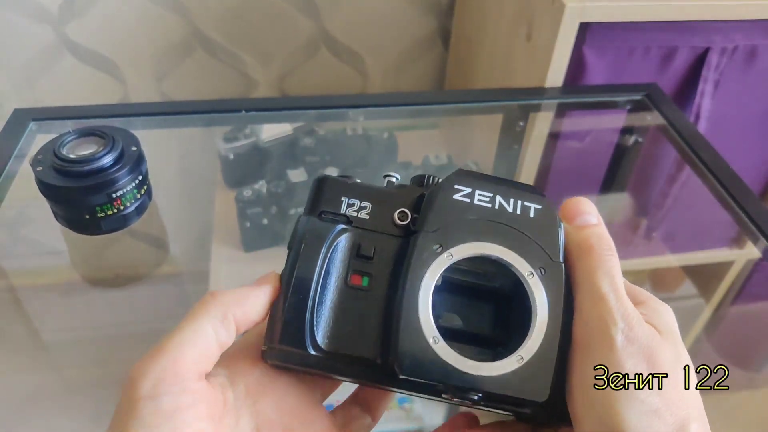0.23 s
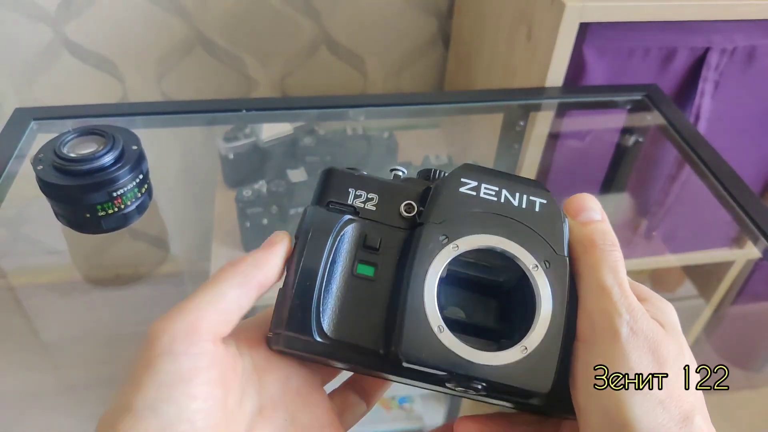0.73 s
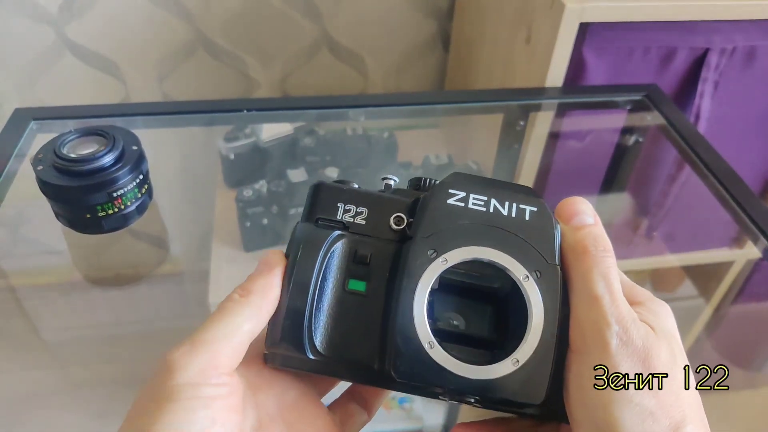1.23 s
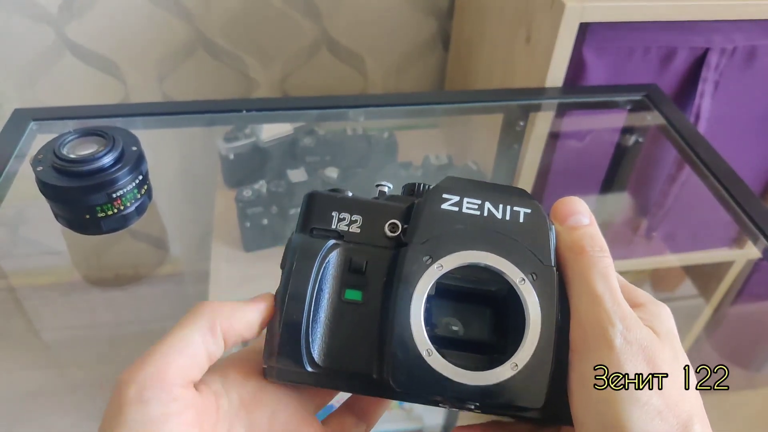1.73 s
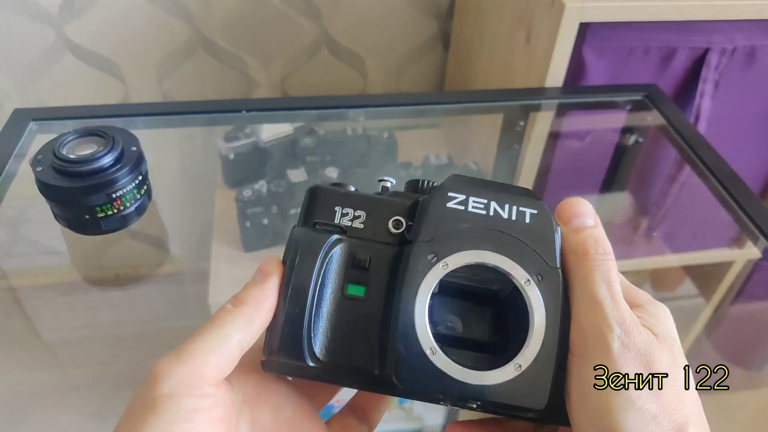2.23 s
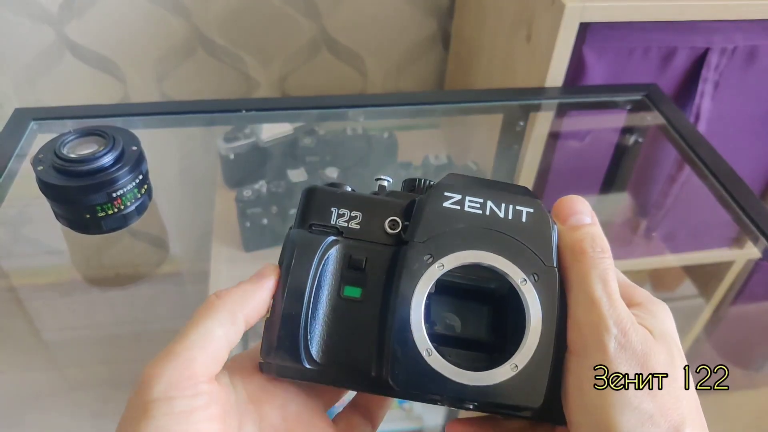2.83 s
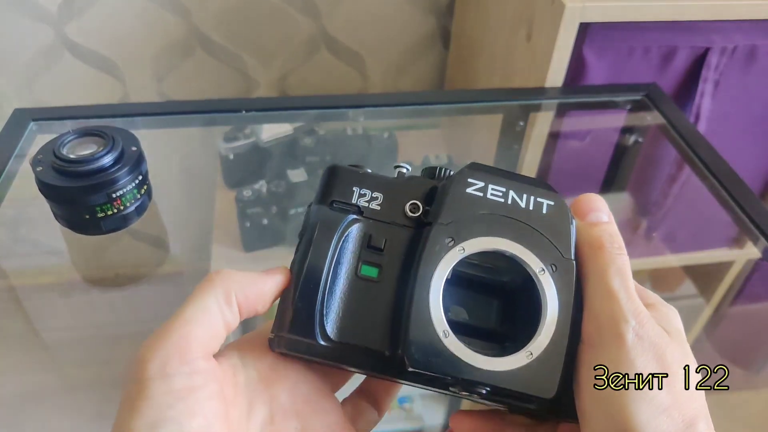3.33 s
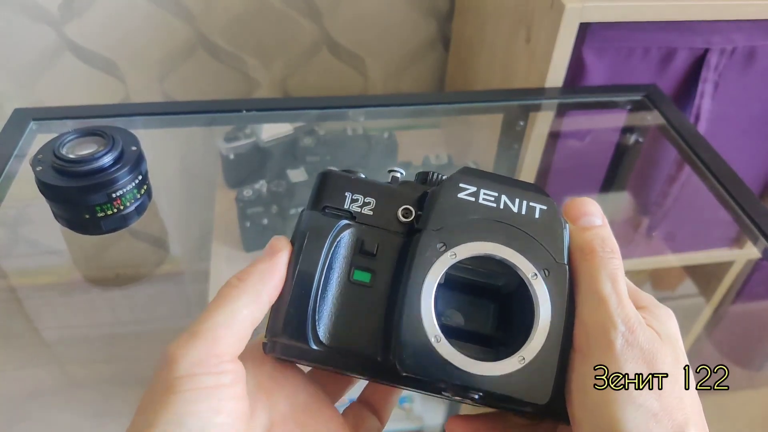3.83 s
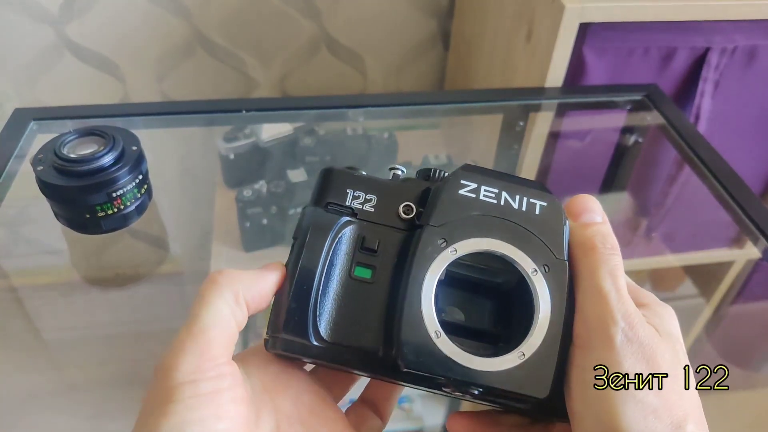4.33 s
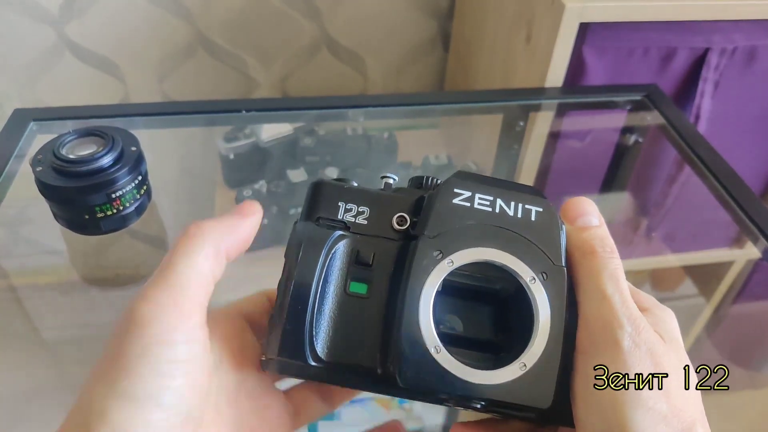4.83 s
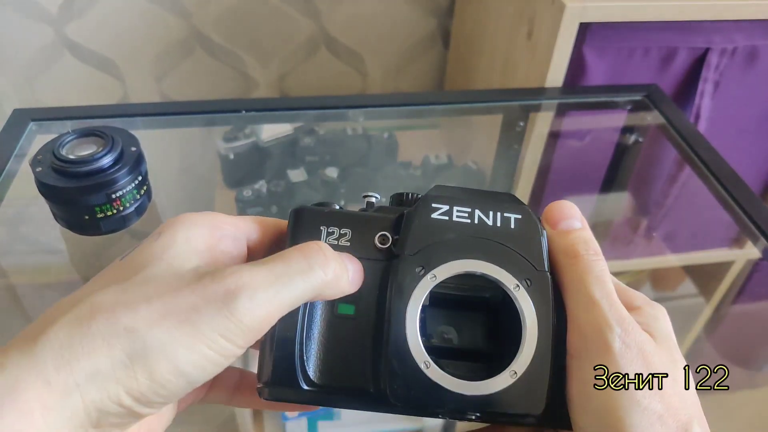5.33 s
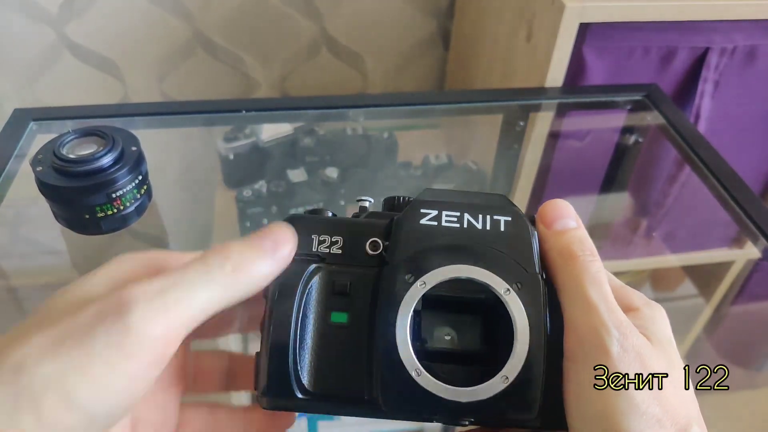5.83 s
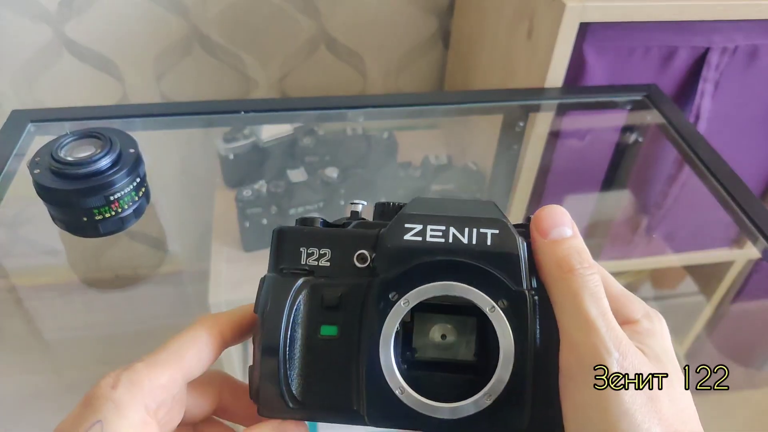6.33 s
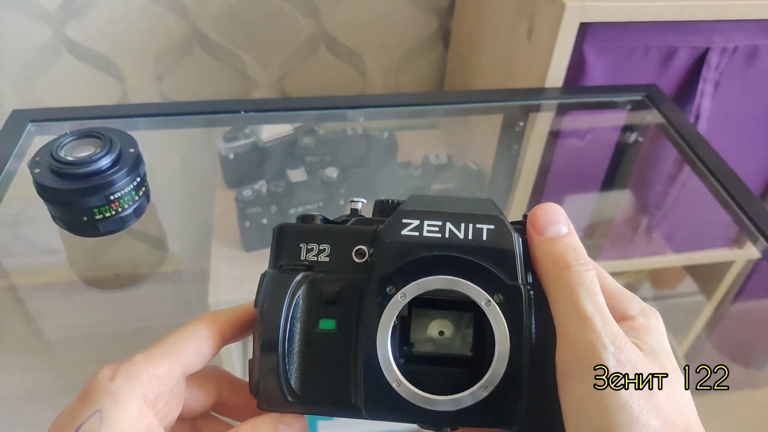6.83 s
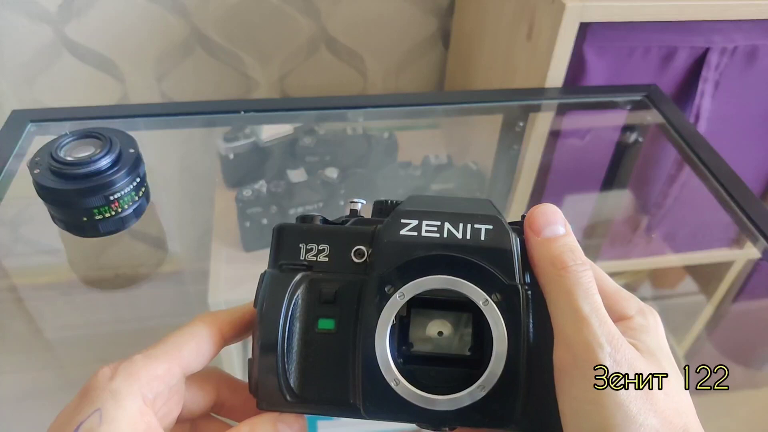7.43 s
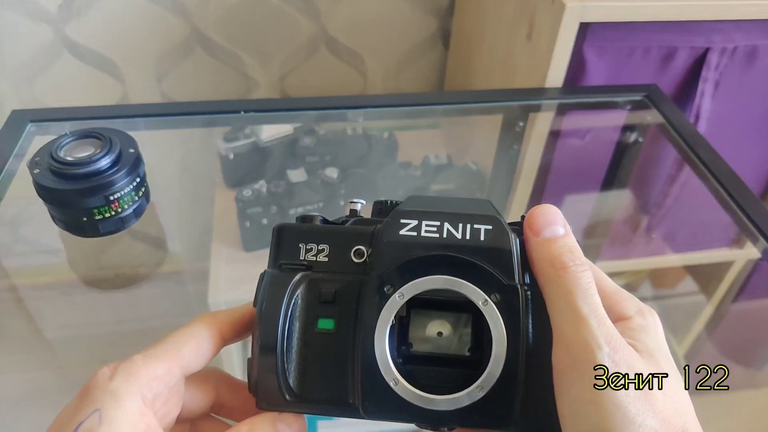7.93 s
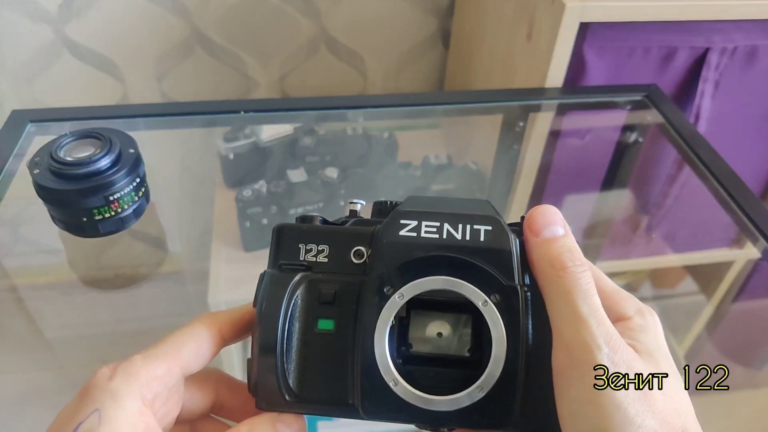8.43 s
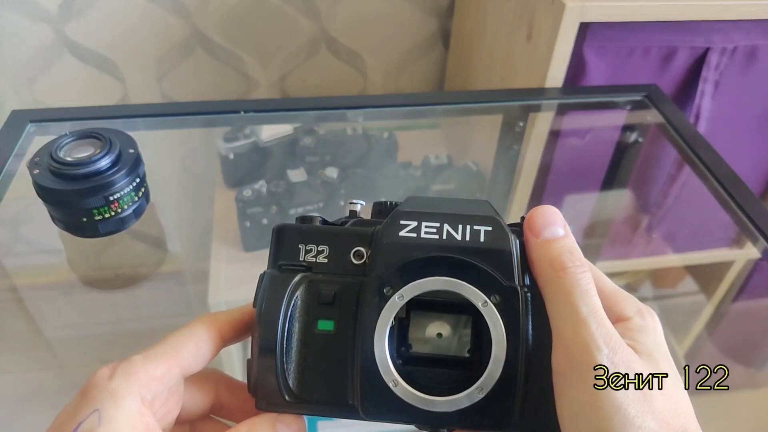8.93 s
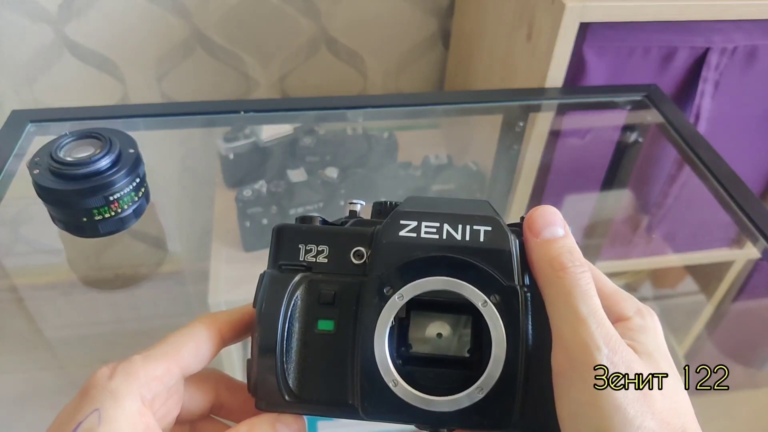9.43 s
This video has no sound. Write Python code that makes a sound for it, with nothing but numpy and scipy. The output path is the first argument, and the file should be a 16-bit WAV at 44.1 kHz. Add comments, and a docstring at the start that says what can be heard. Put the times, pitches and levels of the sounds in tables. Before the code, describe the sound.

Close, dry ticking and small knocks from a handheld mechanical camera, then a fast whirring gear buzz, a loud shutter crack, and buzzing to the end.

```python
"""A film camera's clockwork self-timer, held in the hands close to two microphones in a small room.
First the escapement (the part that beats) sticks: single ticks and short runs, amid knocks and rubs.
Then it runs free and buzzes at about 210 beats a second; soon the shutter trips with one sharp snap.
The buzz goes on to the end, and late on a low drone swells. Air and a faint hum lie under it all.
Blows are short bursts of noise that ring the camera's resonances; hollow rings are damped sine tones."""
import sys
import numpy as np
from scipy import signal
from scipy.fft import rfft, irfft
from scipy.io import wavfile

SR = 44100
rng = np.random.default_rng(int(sys.argv[2]) if len(sys.argv) > 2 else 0)


def unload_audio(sound):
    """Save the sound as a 16-bit wav file, at the path given as the first command line argument."""
    columns = np.transpose(np.atleast_2d(sound))
    # keep every value between -1 and 1, then stretch to whole-number steps
    steps = np.round(np.clip(columns, -1, 1) * 32767)
    wavfile.write(sys.argv[1], SR, steps.astype(np.int16))


N = 426447
TIME, HZ = np.arange(N) / SR, np.fft.rfftfreq(4096, 1 / SR)
START_S = 5.644  # the escapement comes free


def amp(db):
    """Decibels to gain."""
    return 10 ** (np.asarray(db) / 20)


def read(points, hz):
    """A table's value at hz, on a log-frequency axis."""
    f, value = np.transpose(points)
    return np.interp(np.log(hz + 1), np.log(f + 1), value)


def unit(x):
    """Scales to rms 1."""
    return x / np.sqrt(np.mean(x ** 2) + 1e-20)


def add(mix, s, sound):
    """Mixes a sound in at time s."""
    part = mix[max(round(s * SR), 0):][:len(sound)]
    part += sound[:len(part)]


def wander(rate):
    """Slow chance of rms 1 that changes about rate times a second."""
    size = 16384
    hz = np.fft.rfftfreq(size, TIME[-1] / size)
    smooth = np.exp(-(hz / rate) ** 2)
    slow = irfft(rfft(rng.standard_normal(size)) * smooth)
    return unit(np.interp(TIME, np.linspace(0, TIME[-1], size), slow))


def fuzzy_tone(hz, width):
    """A tone of rms 1 whose level and phase waver."""
    cosine = wander(width) * np.cos(2 * np.pi * hz * TIME)
    return cosine + wander(width) * np.sin(2 * np.pi * hz * TIME)


def colour(x, gain):
    """Causal filter of unit energy with the given gain over HZ: its peaks ring after each blow."""
    log_gain = np.log(np.maximum(gain / gain.max(), 1e-5))
    mirrored = np.r_[log_gain, log_gain[-2:0:-1]]
    # minimum phase: nothing sounds before the blow
    taps = np.fft.ifft(np.exp(signal.hilbert(mirrored).conj())).real
    return signal.oaconvolve(x, taps[None] / np.linalg.norm(taps), axes=1)[:, :N]


def weigh(x, gain):
    """Weights the frequencies of one channel without delaying it."""
    return signal.oaconvolve(x, np.fft.fftshift(irfft(gain))[1:], "same")


def pair(x, likeness):
    """Makes two unrelated channels alike, by frequency."""
    same = np.clip(read(likeness, HZ), -1, 1)
    return np.array([x[0], weigh(x[0], same) + weigh(x[1], np.sqrt(1 - same ** 2))])


def chatter(envelope, gain):
    """Metal parts rattle against each other: noise under an envelope rings the resonances."""
    return colour(envelope * rng.standard_normal((2, N)), gain)


def blows(times, levels_db, rise, fall, linger, linger_db):
    """Envelope of blows: a quick rise, a quick fall, and a weaker rattle that lingers (all in s)."""
    t, power = np.arange(SR // 4) / SR, np.zeros(N)
    decay = np.exp(-t / fall) + amp(linger_db) * np.exp(-t / linger)
    shape = (1 - np.exp(-(t / rise) ** 2)) * decay
    for s, db in zip(times, levels_db):
        add(power, s, (amp(db) * shape / shape.max()) ** 2)
    return np.sqrt(power)


def rings(times, levels_db, pitches_hz, rise, fall):
    """Short damped tones in the first channel, one for each blow (rise and fall in s)."""
    t, out = np.arange(SR // 10) / SR, np.zeros((2, N))
    for s, db, hz in zip(times, levels_db, pitches_hz):
        envelope = (1 - np.exp(-t / rise)) * np.exp(-t / fall)
        add(out[0], s, amp(db) * envelope * np.sin(2 * np.pi * hz * t))
    return out


# resonances of the camera: f/Hz, width/Hz, then the relative level/dB of each
# under the running escapement, under a single tick, and under the shutter
RESONANCES = [(737, 480, -26.5, -22, -38), (1066.3, 42.4, -7, -8.5, -21), (1181, 260, -16.5, -14, -7.5),
              (1833, 180, -10.5, -9, 1), (2260, 310, -9.5, -9, -5), (2450, 350, -20, -13, -3.5),
              (3110, 580, -13.5, -11.5, -12), (3594, 210, -11, -11.5, -22), (4250, 450, -17.5, -11.5, 2.5),
              (4827, 323, -12.5, -8, 5), (5430, 490, -15.5, -5.5, 6.5), (5780, 203, -4.5, -10.5, -19),
              (6150, 280, -9, -5.5, -9), (6770, 360, -12, -6, 6), (7960, 1130, -7.5, -1.5, -16),
              (8550, 440, -9.5, -2, 6), (8870, 280, -1.5, -22, -11), (9280, 910, -23, -1, 1.5),
              (9720, 430, -3.5, -15, -5), (10550, 340, -11.5, -1.5, 3), (11240, 450, -12.5, -4.5, -12),
              (11960, 650, -11.5, -11.5, -22), (12100, 1400, -11, -9, -7), (14200, 459, -16, -19, -13),
              (14840, 1800, -13.5, -7.5, -3), (15150, 600, -3, -23, -21)]
RUNNING, TICK, SNAP = 2, 3, 4  # the three level columns
SPLIT_HZ = 3550  # the case speaks below, the steel parts above


def camera(column):
    """Gains over HZ of the camera's resonances: those of the steel parts and those of the case."""
    columns = np.transpose(RESONANCES)
    hz, width = columns[:2]
    peaks = amp(columns[column]) / (1 + 2 * ((HZ[:, None] - hz) / width) ** 2)
    gain = np.linalg.norm(peaks, axis=1) * HZ / np.hypot(HZ, 250)  # less bass below 250 Hz
    upper = 1 - 1 / (1 + (HZ / SPLIT_HZ) ** 12)
    return gain * np.sqrt(upper), gain * np.sqrt(1 - upper)


def beats(turns, uneven_db, limp_db, rise, fall, rub):
    """Envelope of the escapement: each beat has its own strength, and the two pallets may differ."""
    beat, phase, running = turns.astype(int), turns % 1, TIME > START_S
    size = amp(uneven_db * rng.standard_normal(N)[beat] + limp_db * (-1.) ** beat)
    strike = (1 - np.exp(-(phase / rise) ** 2)) * np.exp(-phase / fall)  # rise, fall: parts of a beat
    envelope = (size * strike + rub) * running
    return envelope / np.sqrt(np.mean(envelope[running] ** 2))


USUAL_RATE = 208.6  # beats per second
STEEL_DB, CASE_DB = -35.5, -41.5  # force at that speed; buzz() lifts the steel further
DB_PER_RATE = 0.0748  # faster beats strike harder: dB for each extra beat per second
WEAK_S, WEAK_STEEL_DB, WEAK_CASE_DB = 0.24, -4, -6  # the first beats are weaker by this much


def force(speed):
    """Gains of steel and case: the beats gain strength at first, and follow the speed throughout."""
    weak = np.clip(1 - ((TIME - START_S) / WEAK_S) ** 2, 0, 1)
    drive_db = DB_PER_RATE * (speed - USUAL_RATE)
    return amp(STEEL_DB + drive_db + WEAK_STEEL_DB * weak), amp(CASE_DB + drive_db + WEAK_CASE_DB * weak)


# speed of the free-running escapement, before it strays: t/s, beats per second
SPEED = [(5.7, 228), (5.82, 205), (6.36, 223.5), (6.54, 197), (7.08, 220.5), (7.2, 199), (7.44, 214),
         (7.74, 227), (7.86, 206), (8.1, 204), (8.16, 207), (9.0, 205), (9.12, 219), (9.3, 218),
         (9.48, 197), (9.6, 210)]
# the vibrating body murmurs under the buzz: f/Hz, relative level/dB
MURMUR = [(30, -4), (70, -6.5), (100, 1), (125, -13), (165, -4), (188, -15), (212, -8.5), (250, -11),
          (330, -14), (500, -32)]
# early beats ring like single ticks (share 0-1), then the colour changes
EARLY_SHARE, CHANGE_AT_S, CHANGE_S = 0.68, 6.35, 0.078


def buzz():
    """The spring drives the escapement freely; play in the gears makes the beats stray."""
    speed = np.interp(TIME, *np.transpose(SPEED))
    rate = speed * (1 + .015 * wander(25) + .045 * wander(200))
    running = TIME > START_S
    turns = np.cumsum(rate * running) / SR
    turns = np.maximum(turns + 0.021 * np.sin(np.pi * turns), 0)  # tick and tock are not evenly spaced

    steel_level, case_level = force(speed)
    steel_beats = beats(turns, uneven_db=1.5, limp_db=0.6, rise=0.16, fall=0.38, rub=0.1)
    steel_beats *= amp(5.5) * steel_level
    pallet_beats = beats(turns, uneven_db=2.0, limp_db=0.0, rise=.13, fall=0.21, rub=0.046)
    pallet_beats *= amp(5.0) * steel_level
    case_beats = case_level * beats(turns, uneven_db=1.4, limp_db=1.2, rise=0.038, fall=1.0, rub=0.34)

    top = 1 - 1 / (1 + (HZ / 13500) ** 20)  # the pallet's own high ring varies most from beat to beat
    thin = 1 / (1 + (480 / (HZ + 1)) ** 4)  # takes the bass out of the case
    before_change = .5 * (1 - np.tanh((TIME - CHANGE_AT_S) / (2 * CHANGE_S)))
    early = np.clip(EARLY_SHARE * before_change, 0, 1)
    out = chatter(amp(-64.0) * running, amp(read(MURMUR, HZ)))
    for column, share in ((RUNNING, 1 - early), (TICK, early)):
        steel, case = camera(column)
        high = np.sum(steel ** 2 * top) / np.sum(steel ** 2)  # part of the steel's energy
        out += chatter(steel_beats * np.sqrt(share * (1 - high)), steel * np.sqrt(1 - top))
        out += chatter(pallet_beats * np.sqrt(share * high), steel * np.sqrt(top))
        out += chatter(case_beats * np.sqrt(share), case * thin)
    return out * amp(.5 * wander(31))


# the shutter trips: t/s, level/dB of the ringing steel, level/dB of the knocking case
SHUTTER = [(5.8335, -9.5, -14.5)]


def shutter():
    """The timer trips the shutter: one hard, thin snap."""
    s, steel_db, case_db = np.transpose(SHUTTER)
    steel, case = camera(SNAP)
    ring = blows(s, steel_db, rise=0.00014, fall=0.0011, linger=.0035, linger_db=-22)
    knock = blows(s, case_db, rise=0.00018, fall=0.0013, linger=0.0048, linger_db=-11)
    thin = 1 / (1 + (750 / (HZ + 1)) ** 4)
    return chatter(ring, steel) + chatter(knock, case * thin)


# short runs before it sticks again: start t/s, number of beats, beats per second,
# level/dB of the steel, level/dB of the case
RUNS = [(0.5499, 6, 175, -28, -40), (2.0671, 7, 200, -28.5, -45), (2.9369, 6, 203, -27.5, -43.5),
        (3.7504, 7, 186, -27.5, -43.5)]
RUN_ENDS_DB = -5.5  # a run is strongest in the middle; its first and last beats are this much weaker
RUN_UNEVEN_DB = 1.2  # the beats of a run differ by chance
CATCH_S, CATCH_DB = 0.0174, -18.5  # the pallet gives a faint tick just before each run


def run_beats():
    """Rows (s, steel dB, case dB) for every run: a faint catch, then quick beats that swell and fade."""
    rows = []
    for start, count, rate, steel_db, case_db in RUNS:
        rows.append((start - CATCH_S, steel_db + CATCH_DB, case_db + CATCH_DB))
        for k, place in enumerate(np.linspace(-1, 1, round(count))):
            arch_db = RUN_ENDS_DB * place ** 2 + RUN_UNEVEN_DB * rng.standard_normal()
            rows.append((start + k / rate, steel_db + arch_db, case_db + arch_db))
    return rows


# single ticks of the sticking clockwork: t/s, level/dB of the ringing steel, level/dB of the knocking case
TICKS = [(0.0925, -29, -44.5), (0.099, -38.5, -53), (0.590, -28, -31.5), (0.6804, -32, -51.5),
         (0.8073, -23.5, -39.5), (0.97, -43, -50), (1.1513, -30, -48), (1.1613, -28.5, -41),
         (1.167, -34, -47), (1.2327, -33.5, -48.5), (1.2572, -32.5, -52), (1.399, -34, -54.5),
         (1.641, -24, -37), (2.4953, -34, -51), (2.509, -25.5, -38.5), (3.034, -31.5, -50.5),
         (3.2403, -26, -42), (3.5933, -61, -58.5), (3.8438, -32, -48.5), (3.9229, -31.5, -48),
         (4.0586, -23, -41.5), (4.5272, -54.5, -68), (4.8247, -22.5, -34)]


def ticks():
    """The pallet scrapes along a tooth, then drops onto the next."""
    s, steel_db, case_db = np.transpose(list(TICKS) + run_beats())
    steel, case = camera(TICK)
    scrape = blows(s - .0048, steel_db - 23, rise=.002, fall=0.0023, linger=.003, linger_db=-14)
    drop = blows(s - .0003, steel_db, rise=0.00097, fall=0.00097, linger=0.0041, linger_db=-12.5)
    knock = blows(s - .0003, case_db, rise=0.0011, fall=0.00093, linger=0.0069, linger_db=-10.0)
    return chatter(np.hypot(scrape, drop), steel) + chatter(knock, case)


PLATE_HZ, PLATE_DB = 1994, -28.5  # level under the hardest tick
PLATE_SLOPE = 2.3  # dB lost for each dB that a tick is softer


def plate():
    """Hard single ticks set a plate of the body ringing; softer ones much less."""
    s, steel_db = np.transpose(TICKS)[:2]
    levels_db = PLATE_DB + PLATE_SLOPE * (steel_db - steel_db.max())
    return rings(s, levels_db, np.full(len(s), PLATE_HZ), rise=.0006, fall=0.0028)


# the case creaks and knocks under the fingers: t/s, level/dB of the clack,
# level/dB of the hollow ring, f/Hz of the ring
KNOCKS = [(0.154, -53, -51, 1110), (0.277, -41.5, -38, 2000), (0.855, -53, -44, 1250),
          (0.97, -37.5, -41, 1250), (1.630, -47, -33, 1230), (1.853, -45.5, -41, 1930),
          (2.29, -56, -62, 1200), (2.561, -55, -58, 1100), (2.681, -44, -48, 1330), (2.847, -56, -43, 1240),
          (2.977, -52, -42, 1120), (3.394, -53, -58.5, 1200), (4.112, -41.5, -42, 1250),
          (4.219, -44, -37, 3920), (4.367, -54, -58, 1210), (4.404, -75, -56, 1280),
          (4.712, -64, -48.5, 2080), (5.14, -64, -46, 1070), (5.277, -66, -50, 1070),
          (5.656, -49, -34, 1270)]
OVERTONE, OVERTONE_DB = 2.13, -10.5  # each hollow ring has one weaker, higher partial


def knocks():
    """Each small slip of the case gives a dull clack and a short hollow ring."""
    s, clack_db, ring_db, hz = np.transpose(KNOCKS)
    steel, case = camera(TICK)
    clack = blows(s, clack_db, rise=0.00057, fall=0.0012, linger=0.0057, linger_db=-10)
    dull = case + amp(-8) * steel / (1 + (HZ / 4500) ** 2)
    ring = rings(s, ring_db, hz, rise=0.00075, fall=0.0029)
    partial = rings(s, ring_db + OVERTONE_DB, hz * OVERTONE, rise=0.00044, fall=.0018)
    return chatter(clack, dull) + ring + partial


# the clearest rubs, as the thumb reaches for the button: t/s, level/dB
RUBS = [(4.463, -67.5), (4.685, -62.5), (4.972, -59), (5.048, -65), (5.135, -63.5), (5.277, -59.5),
        (5.585, -60)]
FAINT_RUBS_DB, RUB_SPREAD_DB = -71, 9  # fainter ones come at random while the clockwork sticks


def fingers():
    """Skin slips on the case in soft, scattered rubs that catch once and drag on."""
    when, size = rng.random((18, 2)).T
    faint = np.c_[when * START_S, FAINT_RUBS_DB + RUB_SPREAD_DB * (size - .5)]
    s, levels_db = np.r_[RUBS, faint].T
    case = camera(TICK)[1]
    rubs = blows(s - .002, levels_db, rise=0.0026, fall=0.0066, linger=0.029, linger_db=-14)
    return chatter(rubs, case / (1 + (HZ / 1400) ** 3))


# soft bumps of the hands on the body: t/s, level/dB of the thud, level/dB of the deep push
BUMPS = [(0.588, -67.5, -47.5), (2.089, -68, -53.5), (3.166, -68, -76.5), (3.929, -70, -61),
         (6.03, -50.5, -50), (6.888, -64, -55)]
# tone of the thud: f/Hz, relative level/dB
THUD = [(60, -12.5), (150, -6), (270, 2.5), (400, 2), (600, -24), (2000, -62.5)]
# tone of the push: f/Hz, relative level/dB
PUSH = [(15, -7), (40, -1), (70, -11.5), (140, -28), (600, -58)]


def hands():
    """Fingers shift their grip: dull thuds with a deep push."""
    s, thud_db, push_db = np.transpose(BUMPS)
    thud = blows(s, thud_db, rise=0.0079, fall=0.023, linger=0.097, linger_db=-20)
    push = blows(s - .015, push_db, rise=0.0053, fall=0.021, linger=.05, linger_db=-22)
    return chatter(thud, amp(read(THUD, HZ))) + chatter(push, amp(read(PUSH, HZ)))


# how long the room's echo takes to die by 60 dB: f/Hz, time/s
ECHO_TIME = [(300, 0.62), (1300, 0.27), (3500, 0.28), (9000, 0.24), (15000, 0.23)]


def room(x, wet_db, gap):
    """Sparse reflections, each band dying at its own speed; their pattern shifts as the hands sway."""
    size, count = SR // 2, 3
    wet = np.zeros((2, N))
    for k in range(count):
        taps = rng.standard_normal((2, size)) * (rng.random((2, size)) < .15)
        hz, t, z = signal.stft(taps, SR, nperseg=256)
        dying = amp(-60 * t / read(ECHO_TIME, hz)[:, None])
        tail = signal.istft(z * dying, SR, nperseg=256)[1][:, :size]
        tail = tail * np.clip(TIME[:size] / gap - .5, 0, 1)  # echoes fade in around gap seconds
        share = np.sqrt(2 / count) * np.cos(np.pi * (TIME + k / count))
        swapped = np.roll(x, k, axis=0)  # swap the two channels for every other tail, for smoother echoes
        wet += signal.oaconvolve(swapped * share, tail / np.linalg.norm(tail[0]), axes=1)[:, :N]
    return x + amp(wet_db) * wet


# tone of the room's still air: f/Hz, relative level/dB per Hz
AIR = [(10, -3.5), (25, 1), (65, -3.5), (90, -13), (130, -14), (280, -17), (350, -22), (520, -24.5),
       (800, -26.5), (1150, -28.5), (1900, -31), (5000, -34.5), (10000, -38.5), (15500, -34.5)]
# how alike the air is at left and right: f/Hz, likeness (0-1)
AIR_LIKENESS = [(60, 0.78), (250, 0.45), (700, 0), (2000, 0), (8000, 0)]
AIR_DB = -62


def still_air():
    """Still room air: steady noise, more alike at both sides in the bass."""
    return amp(AIR_DB) * pair(chatter(1, amp(read(AIR, HZ))), AIR_LIKENESS)


# faint hum of the room: f/Hz, level/dB
HUM = [(72, -71), (101, -78.5), (158, -82), (210, -80.5), (275, -82.5), (405, -87.5)]


def hum():
    """A few low tones, each wavering on its own."""
    return sum(amp(db) * fuzzy_tone(hz, width=7.8) for hz, db in HUM)


# gusts of low rumble in the room: middle t/s, length/s, level/dB
RUMBLES = [(7.47, 0.2, -51), (8.123, 0.85, -56.5)]
RUMBLE_HZ, RUMBLE_WIDTH_HZ = 62.7, 16.5
DRONE_S, DRONE_RISE_S, DRONE_DB = 8.35, .3, -48  # a low drone swells late and stays
DRONE_HZ, DRONE_WAVER_DB, DRONE_WAVER_HZ = 63.9, 3, 2.7


def rumble():
    """Low gusts come and go; then a drone around one pitch swells and wavers."""
    gusts = sum(amp(db) * np.exp(-(2 * (TIME - s) / length) ** 4) for s, length, db in RUMBLES)
    rise = np.clip((TIME - DRONE_S) / DRONE_RISE_S, 0, 1)
    swell = rise * amp(DRONE_DB + DRONE_WAVER_DB * wander(DRONE_WAVER_HZ))
    drone = np.sin(2 * np.pi * np.cumsum(DRONE_HZ + 1.6 * wander(3.4)) / SR)
    return gusts * fuzzy_tone(RUMBLE_HZ, width=RUMBLE_WIDTH_HZ) + swell * drone


# the camera at the two microphones: f/Hz, right minus left level/dB
SHADE = [(700, 2.4), (1100, 1), (1450, 6.2), (1850, -6), (2400, 1.2), (3100, -6), (3600, -1.5), (5000, -12),
         (5800, -15.5), (7000, -15.5), (8800, -21.5), (11000, -17), (13500, -13), (15300, -14)]
# how alike the camera is at the two microphones: f/Hz, likeness (0-1)
LIKENESS = [(600, 0.82), (1400, 0.94), (2300, 0.13), (3500, 0.27), (6000, 0), (15000, 0)]


def scene():
    """The camera's treble reaches mostly the left microphone; the background joins after."""
    sources = buzz() + shutter() + ticks() + plate() + knocks() + fingers() + hands()
    left, right = pair(room(sources, wet_db=-11.5, gap=0.0019), LIKENESS)
    at_microphones = np.array([left, weigh(right, amp(read(SHADE, HZ)))])
    return at_microphones + still_air() + hum() + rumble()


EDGE_HZ = 15820


def record(dry):
    """A band limit: a steep filter takes away everything above the edge."""
    return signal.oaconvolve(dry, signal.firwin(511, EDGE_HZ, window=("kaiser", 9), fs=SR)[None], "same")


dry = scene()
out = record(dry)
unload_audio(out)
```